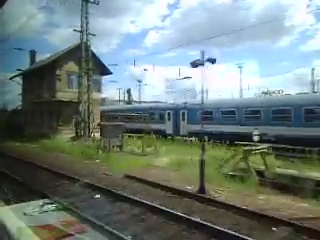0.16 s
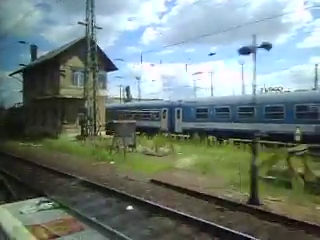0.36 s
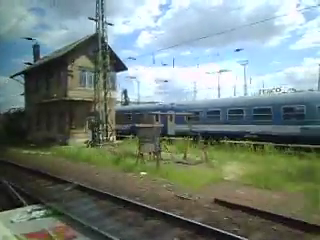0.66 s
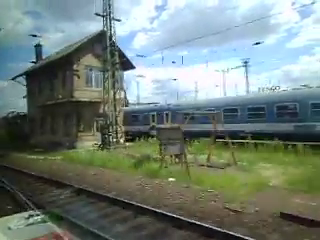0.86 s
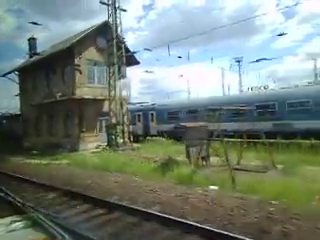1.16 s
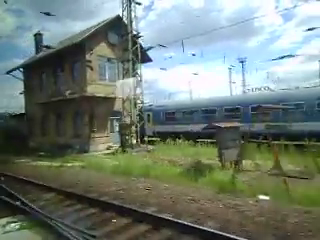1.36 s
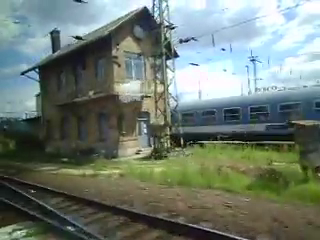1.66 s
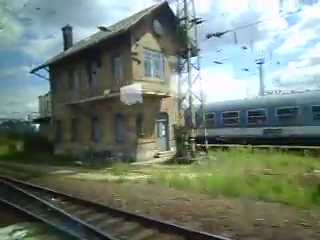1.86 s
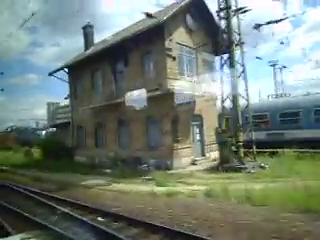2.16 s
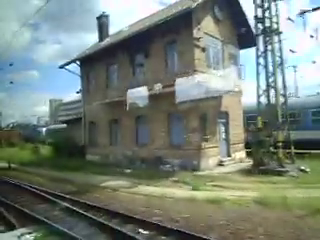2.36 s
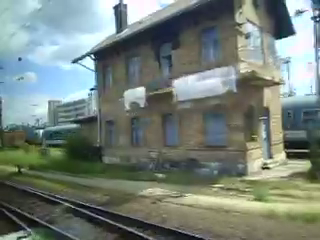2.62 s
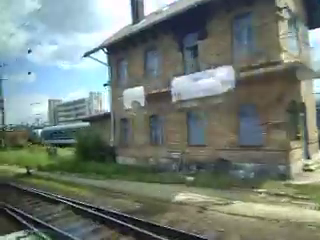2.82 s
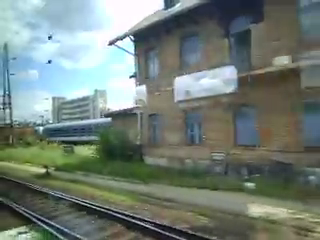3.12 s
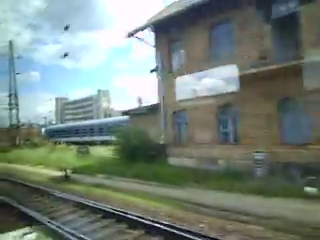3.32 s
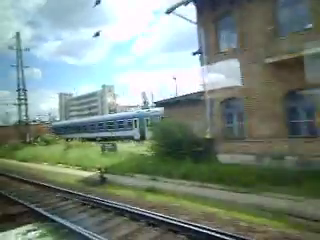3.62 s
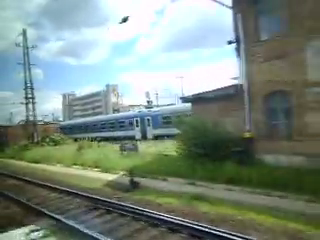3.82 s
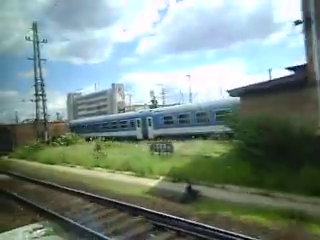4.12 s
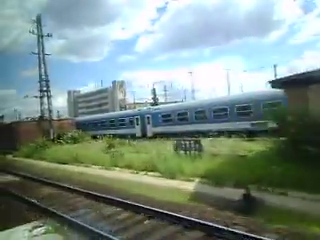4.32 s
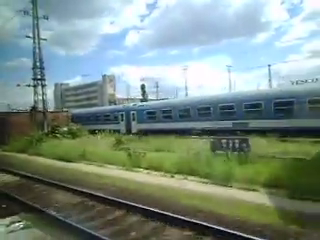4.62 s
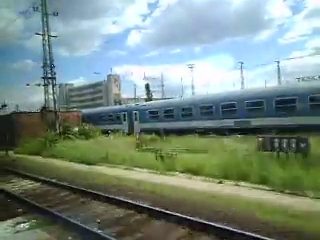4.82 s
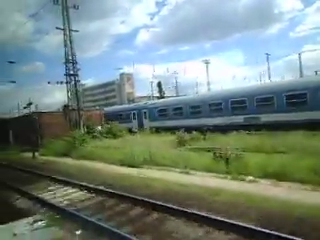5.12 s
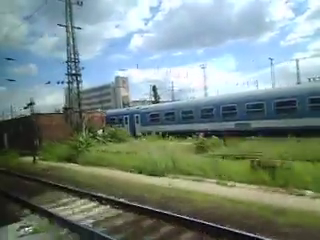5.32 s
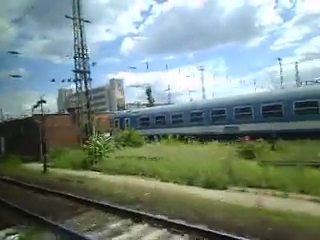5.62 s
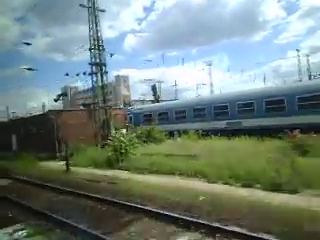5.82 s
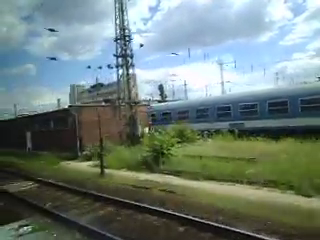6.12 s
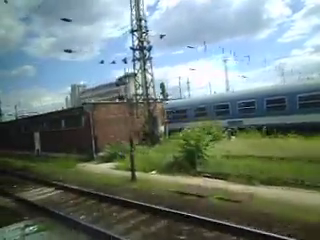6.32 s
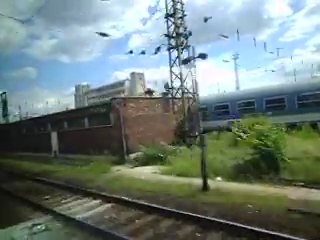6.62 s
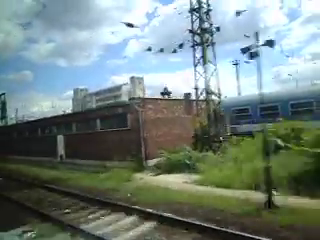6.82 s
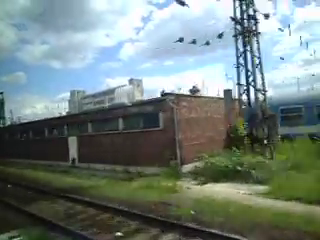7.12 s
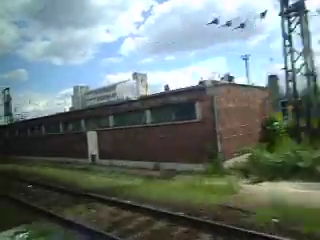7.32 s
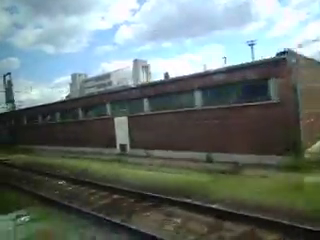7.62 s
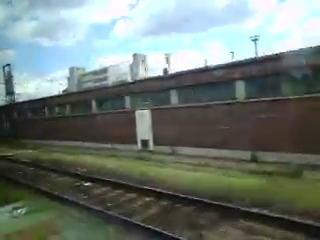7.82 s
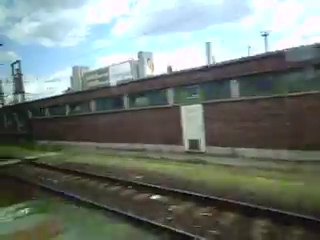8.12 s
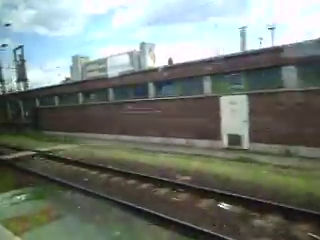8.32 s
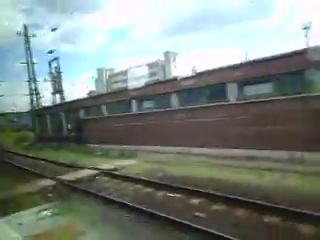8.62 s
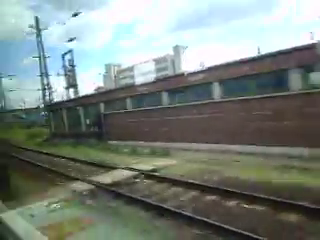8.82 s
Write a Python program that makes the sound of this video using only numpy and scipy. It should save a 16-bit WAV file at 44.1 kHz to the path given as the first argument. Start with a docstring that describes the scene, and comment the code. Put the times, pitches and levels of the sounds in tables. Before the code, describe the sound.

Heard from inside a passenger carriage moving slowly through a rail yard: a steady low rumble and droning floor, rocked by irregular dull thuds as wheels cross joints and points. Clunks crowd together in the first few seconds, ease around four, then return. Fittings hum briefly, wheels sing very faintly early on, and a dry tick snaps close to the microphone near the end. The sound is dark and muffled, with little treble.

```python
"""The body of a slowly moving railway carriage heaves and booms as it crosses points in a yard.
Body: three bands of low noise on a steady level curve, rocked further by each rail joint.
Wheels roll and knock: four ranges of noise follow rolling and joint levels; floor and wheel notes follow.
Fittings hum briefly and flanges sing faintly in a curve: narrow resonant noise.
Late on, something near the microphone ticks in bouncing noise bursts; a short bright hiss comes earlier."""
import sys
import numpy as np
from scipy import signal
from scipy.fft import rfft, irfft
from scipy.io import wavfile
from scipy.ndimage import uniform_filter1d

SR = 44100
rng = np.random.default_rng(int(sys.argv[2]) if len(sys.argv) > 2 else 0)


def put_to_file(sound):
    """Save the sound as 16-bit audio at rate SR, in the file named by the first command-line argument."""
    columns = np.atleast_2d(sound).T  # one column per channel
    safe = np.clip(columns, -1, 1)
    whole_steps = np.round(safe * 32767)
    wavfile.write(sys.argv[1], SR, whole_steps.astype(np.int16))


N = 395136
TIME = np.arange(N) / SR
CLATTER_SHARE = 0.7  # share of the brightness dB that clatter takes; hiss takes all

# steel rolling on steel: (time [s], roar level [dB], floor drone re roar [dB], brightness [dB],
# wheel note strength before its fixed offset [dB])
ROLLING = [(0.0, -42.5, 1.5, 2, -1), (0.25, -46, 8.5, 1, -2), (0.6, -47, 8, 0.5, -9),
           (1.2, -41, 1.5, 2, -3), (1.35, -44, 2, 1, -6), (1.55, -42, 6.5, -0.5, -1), (1.75, -41, 3, 1, -4),
           (1.9, -41, 2.5, 3.5, 7), (2.05, -46, 4.5, 4, 3.5), (2.25, -42.5, 3, 4, 8),
           (2.56, -48, 5.5, -1.2, -7), (2.93, -52, 10, 6.5, -2), (3.14, -40, 4, 3.5, 5),
           (3.35, -41, 3, 0.5, 2.5), (3.7, -47, 8, 2.8, 8), (4.05, -50, 3, -0.8, -7),
           (4.4, -57, 10.5, 1.5, 5), (4.6, -45.5, 2, 2, 3.5), (5.19, -43.5, 5, 2, -2),
           (5.6, -48.5, 3.5, -1, 0), (5.92, -52, 8, -7.5, -3), (6.3, -47.5, 6.5, -1.5, -4),
           (6.9, -50, 4.5, -1.5, -7.5), (7.4, -48, 6, 1, -7), (7.6, -42.5, 5.5, 0.5, 4),
           (8.1, -49, 6, 2, -3), (8.96, -45.5, 7, -8, -17)]
# wheels over joints and crossings: (time [s], nominal roar peak [dB], thud re peak [dB], brightness [dB],
# roar t60 [s])
JOINTS = [(0.032, -31, 11, 5, 0.27), (0.632, -35.5, 6, 0, 0.75), (1.118, -35, 11.5, -6, 0.38),
          (1.217, -30, -7, -2, 0.15), (1.366, -28, 3.5, -6, 0.45), (1.667, -28, 6.5, 1.5, 0.24),
          (1.771, -23, 5, -5.5, 0.24), (2.065, -26.5, 7.5, -4, 0.34), (2.193, -28, 10.5, 2, 0.21),
          (2.575, -46, 0, 11, 1), (2.948, -28, 4.5, -5, 0.53), (3.068, -31, 11, 1.5, 0.27),
          (3.234, -29, 6, -6, 0.45), (3.32, -32.5, -6, 5, 0.48), (3.381, -32.5, -14, 7, 0.39),
          (4.42, -29, 5.5, -4.5, 0.58), (4.69, -23.5, 3, -9, 0.31), (4.859, -41, -4, 7, 0.32),
          (5.043, -28, 6.5, -2, 0.14), (5.312, -25.5, 4.5, -5, 0.52), (5.636, -37.5, -0.6, 0.5, 0.97),
          (5.907, -38.5, 2.5, -2, 0.71), (6.116, -38, -8, -0.5, 0.98), (6.228, -30, 0.3, -10, 0.16),
          (6.394, -35, 2.5, 1, 1), (6.669, -36.5, -2, 2, 0.37), (6.87, -35.5, 5.5, -4.5, 0.58),
          (7.075, -33.5, 3.5, -3, 0.68), (7.337, -32.5, 6.5, -2, 0.3), (7.459, -28.5, 4, -7, 0.23),
          (7.56, -41, 10.5, -6, 0.52), (7.709, -29.5, -10, -19, 0.31), (8.069, -38.5, 8.5, 3.5, 0.24),
          (8.324, -42, 3.5, 5, 0.25), (8.447, -48.5, 21, 7, 0.36), (8.809, -38.5, 2.5, 1, 0.63)]


def gain_of(db):
    """Amplitude gain of a level in dB."""
    return 10 ** (np.asarray(db) / 20)


def evened(x):
    """Scale to rms 1."""
    return x / np.sqrt(np.mean(x ** 2) + 1e-20)


def read(points, hz):
    """Interpolate a (frequency, value) table over log frequency."""
    f, value = np.transpose(points)
    return np.interp(np.log(hz + 1), np.log(f + 1), value)


def curves(rows):
    """Interpolate each column of a table over the scene's time."""
    s, *columns = np.transpose(rows)
    return [np.interp(TIME, s, column) for column in columns]


def add(mix, s, sound):
    """Add a sound into mix from time s, cut at the end."""
    part = mix[round(s * SR):][:len(sound)]
    part += sound[:len(part)]


def coloured(gain):
    """Scene-long noise of rms 1, its spectrum shaped by gain(hz)."""
    spectrum = rfft(rng.standard_normal(N))
    return evened(irfft(spectrum * gain(np.fft.rfftfreq(N, 1 / SR)), N))


def wander(top_hz):
    """Slow random curve of rms 1, changing mostly below top_hz."""
    return coloured(lambda hz: np.exp(-(hz / top_hz) ** 2))


def resonate(x, centre_hz, width_hz):
    """One-pole resonance of gain 1: shift down to 0 Hz, smooth, shift back."""
    turn = np.exp(2j * np.pi * centre_hz * np.arange(len(x)) / SR)
    r = np.exp(-np.pi * width_hz / SR)
    return 2 * (turn * signal.lfilter([1 - r], [1, -r], x / turn)).real


def whistle(centre_hz, width_hz):
    """Scene-long noise of rms 1 in one steep resonance."""
    return coloured(lambda hz: 1 / (1 + (2 * (hz - centre_hz) / width_hz) ** 2))


def body():
    """Sprung body: heave, bending note and floor boom; steady power plus rocking after each joint."""
    # steady part: (time [s], heave level [dB], bending note level [dB], floor boom level [dB])
    steady = [(0.0, -31, -32, -37), (0.25, -23.5, -32, -38.5), (0.7, -29, -36, -37), (1.15, -34, -33, -38),
              (1.33, -27, -44, -41), (1.6, -23.5, -37, -36), (1.9, -22, -26, -32), (2.04, -25, -34.5, -39),
              (2.4, -25, -28.5, -40), (2.6, -27.5, -39, -40), (2.98, -27, -38, -39),
              (3.12, -20.5, -20.5, -28), (3.7, -21, -27, -34), (3.8, -32.5, -39, -36.5),
              (4.4, -27.5, -39, -41), (5.1, -23, -28.5, -33), (5.3, -19, -33, -30),
              (5.6, -27.5, -33.5, -38.5), (6.6, -30, -32, -34), (7.0, -29.5, -38, -38),
              (7.3, -22, -34.5, -37.5), (7.65, -25.5, -27, -30), (8.0, -25.5, -26, -32),
              (8.3, -32.5, -37, -37), (8.5, -34, -38.5, -32), (8.75, -30, -24, -40),
              (8.96, -35, -26, -33.5)]
    # rocking by each thud, rows heave, bending note, boom: (level re thud [dB], rise constant [s], t60 [s])
    rocking_settings = [(-8, 0.051, 1), (-9, 0.021, 1), (-4, 0.0098, 0.56)]
    # heave spectrum: (frequency [Hz], relative density [dB per Hz])
    heave_shape = [(3, -5.5), (10, -3), (22, -3), (33, -10.5), (40, -25)]
    # bending note spectrum: (frequency [Hz], relative density [dB per Hz])
    bending_shape = [(30, -28), (38, -10), (45, 2.5), (54, -10), (62, -23)]
    # boom spectrum: (frequency [Hz], relative density [dB per Hz])
    boom_shape = [(50, -19.5), (62, 0.5), (80, -2.5), (95, 1), (112, -6.5), (130, 0), (148, -8.5),
                  (170, -11), (190, -23.5), (240, -40.5)]
    waver_db, waver_hz = 2, 6

    heave = coloured(lambda hz: gain_of(read(heave_shape, hz)) * (hz > 3) * (hz < 42))
    bending = coloured(lambda hz: gain_of(read(bending_shape, hz)) * (hz > 28) * (hz < 65))
    boom = coloured(lambda hz: gain_of(read(boom_shape, hz)) * (hz > 48) * (hz < 250))
    out = np.zeros(N)
    for steady_db, settings, noise in zip(curves(steady), rocking_settings, [heave, bending, boom]):
        level = np.sqrt(gain_of(steady_db) ** 2 + rocking(*settings))
        out += level * gain_of(waver_db * wander(waver_hz)) * noise
    return out


def rocking(db, rise_s, t60_s):
    """Power that joint thuds pass to the body: each swings up, then decays."""
    power, t = np.zeros(N), np.arange(SR) / SR
    swing = (1 - np.exp(-t / rise_s)) * gain_of(db - 60 * t / t60_s)
    for s, peak_db, thud_db, *_ in JOINTS:
        add(power, s, (swing * gain_of(peak_db + thud_db)) ** 2)
    return power


def rolling():
    """Rolling amplitude of drone, roar, clatter, hiss: rough rail shakes all together, each also flutters."""
    clatter_db, hiss_db = -9, -13.5  # re roar, before brightness
    roar_db, drone_db, bright_db, _ = curves(ROLLING)
    relative_db = np.array([drone_db, 0 * roar_db,
                            clatter_db + CLATTER_SHARE * bright_db, hiss_db + bright_db])
    common_db = 0.8 * wander(14)
    flutter_db = np.array([wander(10), 0.7 * wander(14), 0.8 * wander(12), 0.8 * wander(25)])
    return gain_of(roar_db + relative_db + common_db + flutter_db)


def joints():
    """Joint amplitude of the four ranges: a hard knock, then a ring of the carriage; the thud is slower."""
    clatter_db, hiss_db = -7, -12.5  # re peak, before brightness
    rise_s = 0.0028  # time constant, scaled by slow
    crest = 3  # noise peaks stand about three times over rms
    power, t = np.zeros((4, N)), np.arange(SR) / SR
    knock = 1 + 0.3 * np.exp(-t / 0.008)
    for s, peak_db, thud_db, bright_db, t60_s in JOINTS:
        ranges = [(thud_db, 1.3), (0, 1),  # (level re peak [dB], time stretch)
                  (clatter_db + CLATTER_SHARE * bright_db, 1.1), (hiss_db + bright_db, 0.9)]
        for k, (db, slow) in enumerate(ranges):
            swell = knock * (1 - np.exp(-t / (rise_s * slow)))
            fall_db = 60 * (t / (t60_s * slow)) ** 1.25  # holds, then falls
            add(power[k], s, (swell * gain_of(peak_db + db - fall_db)) ** 2)
    return np.sqrt(power) / crest


def track_noise():
    """Track vibration coloured by the cabin, split by frequency: floor drone, roar, clatter, hiss."""
    # colour of track sound inside, held above 7300 Hz: (frequency [Hz], relative density [dB per Hz])
    cabin = [(88, -33), (150, 4.5), (182, -0.5), (261, -5), (404, -7.5), (483, -11.5), (658, -14),
             (738, -11.5), (1280, -21.5), (2050, -30), (2940, -24), (3810, -36.5), (5190, -31.5),
             (7300, -33.5), (9490, -69), (16100, -120)]
    # resonances of floor, walls and wheels: (frequency [Hz], width [Hz], boost [dB])
    panels = [(233, 7.5, 0.5), (271, 14, 5), (330.5, 10, 4), (714, 320, -4), (1320, 130, 0),
              (3000, 360, -1.5), (5160, 1000, 4), (6970, 180, 2)]
    edges_hz = [170, 560, 1950, 3700, 12000]

    def inside(hz):
        boost_db = sum(db / (1 + (2 * (hz - f) / width) ** 2) for f, width, db in panels)
        return gain_of(read(cabin, np.minimum(hz, 7300)) + boost_db)

    def power_below(hz, edge_hz):
        return 1 / (1 + (hz / edge_hz) ** 12)

    def one_range(lo, hi):
        return coloured(lambda hz: inside(hz) * np.sqrt(power_below(hz, hi) * (1 - power_below(hz, lo))))

    return np.array([one_range(lo, hi) for lo, hi in zip(edges_hz, edges_hz[1:])])


def patchy(x, depth_db):
    """Random time-frequency patches swell and sink, as different panels take up the shaking."""
    z = signal.stft(x, nperseg=512)[2]
    patches = uniform_filter1d(rng.standard_normal(z.shape), size=5, axis=0)  # over frequency
    patches = uniform_filter1d(patches, size=9, axis=1)  # over time
    return signal.istft(z * gain_of(depth_db * evened(patches)), nperseg=512)[1][:N]


def moan(drone, roar):
    """Floor and wheel resonances: narrow noise follows drone and roar; floor notes also swell by chance."""
    # two floor notes: (frequency [Hz], width [Hz], level re drone, before waver and strength curve [dB])
    floor_notes = [(261, 53, -7), (418.4, 45, -12.5)]
    # strength of the higher floor note: (time [s], added level [dB])
    high_strength = [(0, -7), (.9, 3), (1.5, 7), (2.2, -2), (2.9, 1.5), (3.5, -4.5), (4.4, -3), (5.0, 2),
                     (5.5, 3), (6.0, 2.5), (6.6, 8), (7.3, 3.5), (7.9, -5.5), (8.96, 2)]
    # wheel note, one row: (frequency [Hz], width [Hz], level re roar, before rolling strength [dB])
    wheel_note = (1300, 180, -10.5)
    waver_db, waver_hz = 2, 3.6

    low, high = (gain_of(db + waver_db * wander(waver_hz)) * whistle(hz, width)
                 for hz, width, db in floor_notes)
    floor = drone * (low + gain_of(curves(high_strength)[0]) * high)
    hz, width, db = wheel_note
    wheel = roar * gain_of(db + curves(ROLLING)[-1]) * whistle(hz, width)
    return floor + wheel


def hums():
    """Floor, panels and fittings ring briefly: narrow noise, wider at higher pitch."""
    # (time [s], frequency [Hz], level [dB], fall constant [s])
    ringing = [(0.619, 2930, -46, 0.018), (1.203, 2930, -45.5, 0.048), (1.38, 129, -31.5, 0.22),
               (2.071, 255, -26.5, 0.028), (2.607, 2960, -51.5, 0.044), (3.068, 1300, -38, 0.021),
               (3.153, 1300, -42, 0.033), (3.232, 1400, -34, 0.013), (3.357, 1310, -39, 0.048),
               (4.418, 260, -37, 0.087), (4.704, 730, -37.5, 0.036), (5.041, 370, -42, 0.052),
               (5.089, 390, -28.5, 0.041), (5.311, 363, -29.5, 0.13), (7.709, 376, -32.5, 0.048),
               (8.0, 2930, -49, 0.016), (8.333, 2970, -56, 0.06), (8.442, 2950, -53, 0.03),
               (8.515, 4350, -65, 0.14), (7.754, 1192, -43, 0.024)]
    out, t = np.zeros(N), np.arange(SR // 2) / SR
    for s, hz, db, length_s in ringing:
        width_hz = 30 + 0.041 * hz  # of each of two passes
        held = np.minimum(t / 0.0064, 1) * np.exp(-(t / length_s) ** 3)
        noise = rng.standard_normal(2 * len(t))
        ring = resonate(resonate(noise, hz, width_hz), hz, width_hz)
        tone = held * ring[len(t):]  # skip the resonator's build-up
        add(out, s, gain_of(db) * tone / np.sqrt(np.sum(tone ** 2) / np.sum(held ** 2)))
    return out


def flanges():
    """Wheel modes fed by flange friction: fuzzy wavering lines that come and go."""
    # rubbing in the curve: (time [s], added level [dB])
    singing = [(0, 4), (.9, 10), (1.3, 4.5), (1.8, 9), (2, -20), (3, -19), (4.3, -21), (4.5, -5),
               (8.96, -11)]
    # wheel modes: (frequency [Hz], rms before waver and singing [dB])
    modes = [(3332, -70), (4285, -77), (5060, -75), (5227, -73), (5819, -74), (6175, -76), (6761, -78),
             (7106, -78), (7650, -84), (8349, -95)]
    lines = sum(gain_of(db + 0.64 * wander(5.5)) * whistle(hz, 83) for hz, db in modes)
    return gain_of(curves(singing)[0]) * lines


def ticks():
    """Dry snaps close by: decaying resonant noise that bounces every few milliseconds."""
    # (time [s], peak [dB], centre [Hz], t60 of the excitation [s])
    snaps = [(7.7495, -25, 4100, .05), (7.751, -31, 2300, .04), (7.7505, -24, 1220, .05),
             (7.815, -38, 6500, .02), (8.903, -39, 6200, .015), (8.903, -37, 3100, .015)]
    out, t = np.zeros(N), np.arange(4000) / SR
    bounces = 0.15 + np.exp(-(t % 0.0042) / 0.0013)
    for s, db, hz, t60_s in snaps:
        width_hz = 0.8 * hz
        burst = rng.standard_normal(len(t)) * bounces * gain_of(-60 * t / t60_s)
        snap = resonate(resonate(burst, hz, width_hz), hz, width_hz)
        add(out, s, gain_of(db) * snap / abs(snap).max())
    return out


def puff():
    """One short bright hiss: twice-resonated noise under a smooth window."""
    start_s, length_s, centre_hz, width_hz = 5.02, 0.06, 5900, 3500
    rms_db = -45  # before the window
    noise = rng.standard_normal(round(length_s * SR))
    air = resonate(resonate(noise, centre_hz, width_hz), centre_hz, width_hz)
    out = np.zeros(N)
    add(out, start_s, gain_of(rms_db) * evened(air) * np.hanning(len(air)))
    return out


def scene():
    """Mix all sources to one channel; rolling and joint levels add in power."""
    shaking = np.hypot(rolling(), joints())
    track = patchy((shaking * track_noise()).sum(0), depth_db=1.5)
    drone, roar = shaking[:2]
    mix = body() + track + moan(drone, roar) + hums() + flanges() + ticks() + puff()
    return mix[None]


def record(dry):
    """Gently squeeze large swings, fade the microphone's top treble, band-limit, add faint electronic hiss."""
    # microphone response: (frequency [Hz], gain [dB])
    response = [(7300, 0.5), (7600, -5), (7950, -19), (8400, -17), (8800, -24)]
    edge_hz, hiss_db = 8900, -102.5
    margin = 2048  # samples of reflected padding
    squeezed = 0.45 * np.tanh(dry / 0.46)
    padded = np.pad(squeezed, ((0, 0), (margin, margin)), "reflect", reflect_type="odd")
    size = padded.shape[1]
    response_gain = gain_of(read(response, np.fft.rfftfreq(size, 1 / SR)))
    heard = irfft(rfft(padded) * response_gain, size)
    lowpass = signal.firwin(511, edge_hz, window=("kaiser", 9), fs=SR)
    limited = signal.oaconvolve(heard, lowpass[None], "same")
    return limited[:, margin:-margin] + gain_of(hiss_db) * rng.standard_normal(dry.shape)


dry = scene()
out = record(dry)
put_to_file(out)
```